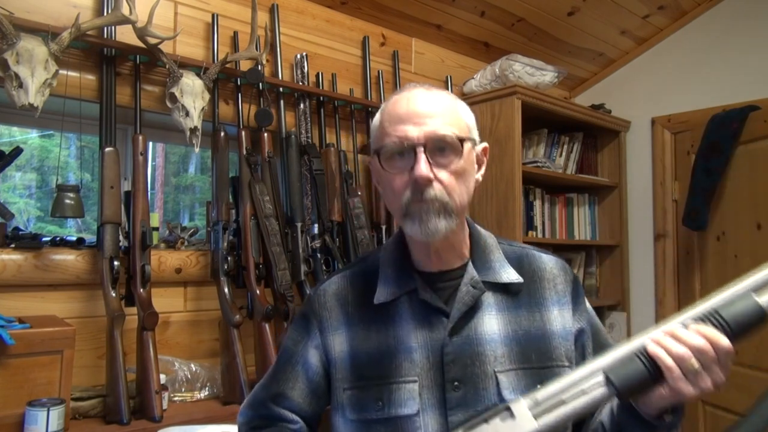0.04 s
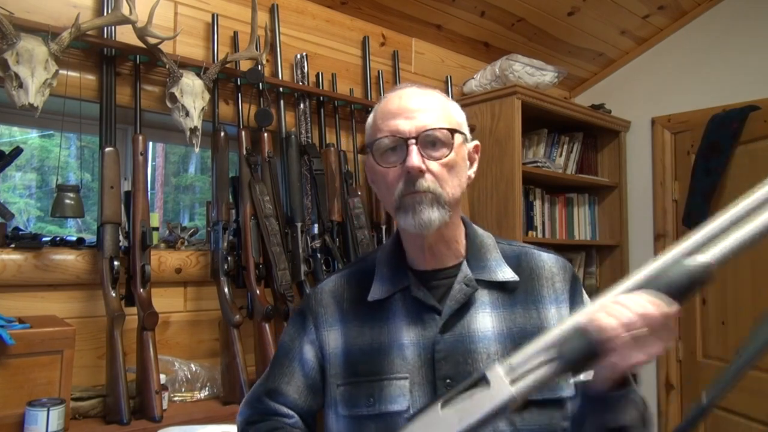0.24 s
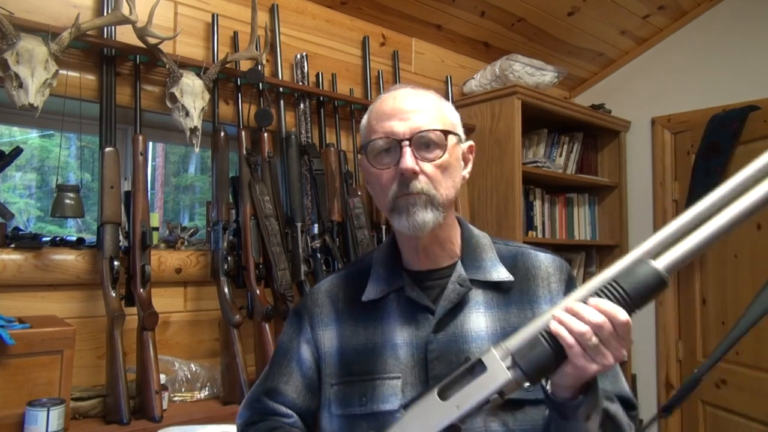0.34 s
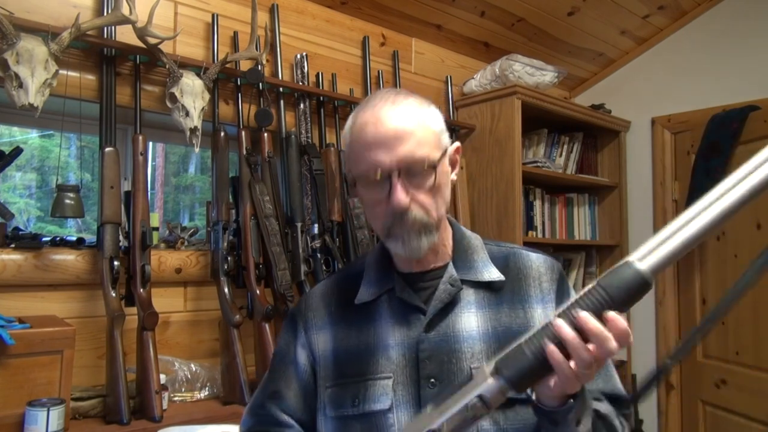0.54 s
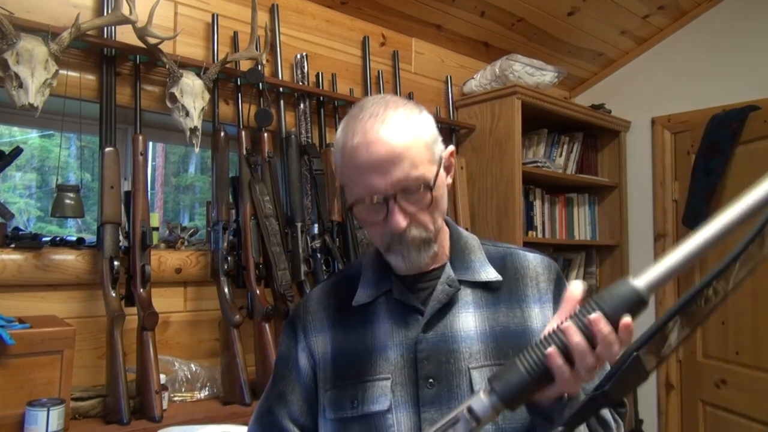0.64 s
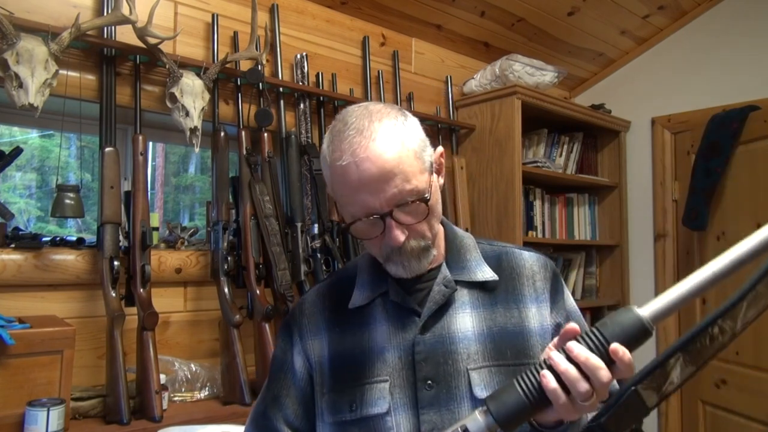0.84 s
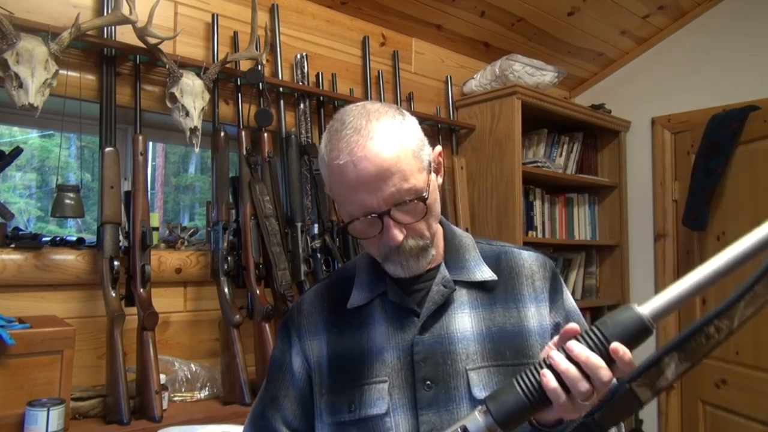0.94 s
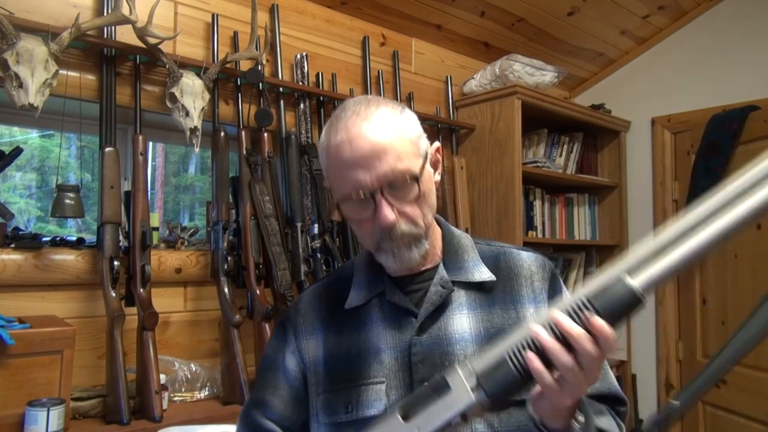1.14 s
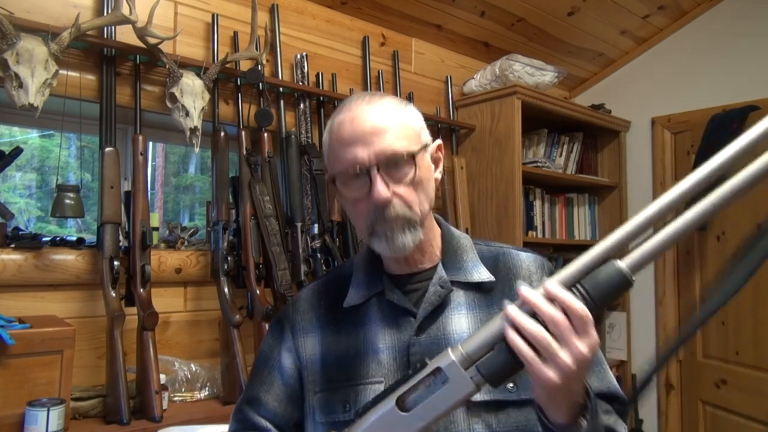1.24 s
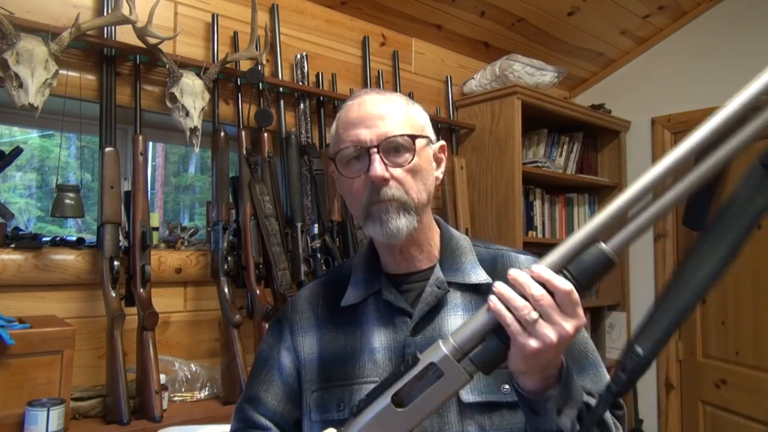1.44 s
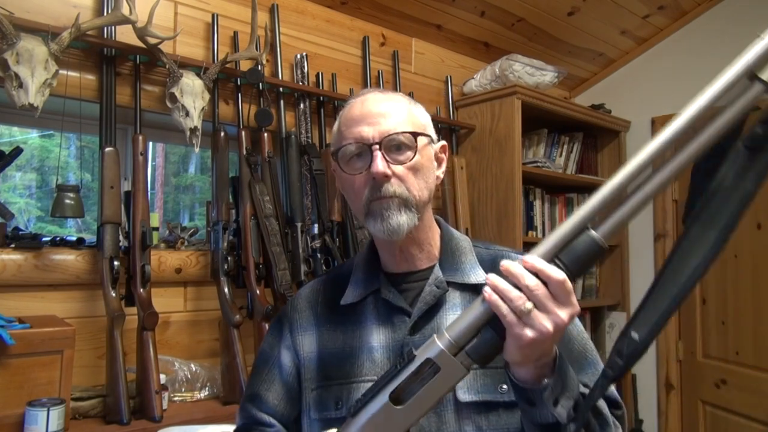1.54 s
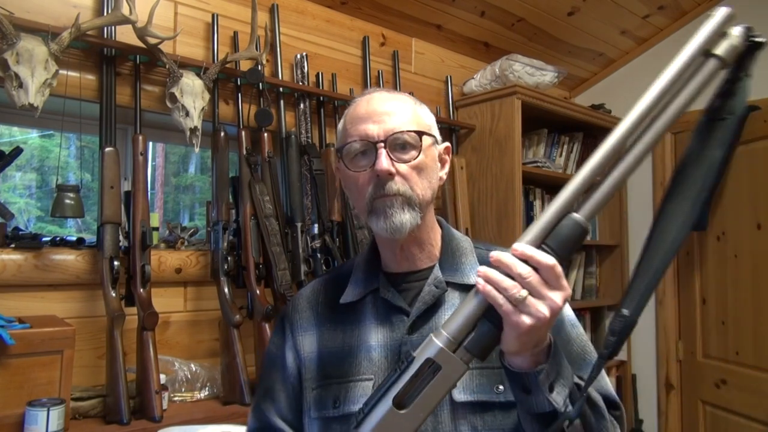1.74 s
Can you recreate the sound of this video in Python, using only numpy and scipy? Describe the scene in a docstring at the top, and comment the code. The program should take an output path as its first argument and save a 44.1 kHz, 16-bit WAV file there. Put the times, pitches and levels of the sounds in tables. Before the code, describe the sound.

A pump-action shotgun is racked close to a stereo microphone in a small wooden room: a rapid raspy steel clatter backward, a crisp click, a pause, then a firm strike and ringing slam shut.

```python
"""A small wood-panelled room, with a pump-action shotgun racked close to a camera's stereo microphones.
The slide comes back in a run of steel clacks over a bright rasp, and a small part clicks into place.
After a pause the slide rubs forward, strikes once firmly and locks shut; a thin ping follows.
Contacts are noise bursts through coloured bodies with ringing steel modes; friction is many tiny slips.
Decaying noise makes the room's tail, soft low thumps mark jolts in the hands, and faint hiss lies beneath."""
import sys
import numpy as np
from scipy import signal
from scipy.fft import rfft, irfft, next_fast_len
from scipy.io import wavfile

SR = 44100
rng = np.random.default_rng(int(sys.argv[2]) if len(sys.argv) > 2 else 0)


def unload_audio(sound):
    """Save the sound as a 16-bit wav file, at the path given as the first command line argument."""
    columns = np.transpose(np.atleast_2d(sound))
    # keep every value between -1 and 1, then stretch to whole-number steps
    steps = np.round(np.clip(columns, -1, 1) * 32767)
    wavfile.write(sys.argv[1], SR, steps.astype(np.int16))


N = 79380  # 1.8 s

# Faint room noise: colour (frequency [Hz], level [dB])
HISS_COLOUR = [(15, -54.5), (25, -25), (113, -20), (156, -18), (322, -6), (509, -1), (703, -2), (762, -1),
               (997, -1), (1270, 0), (3930, -7.5), (11200, -19.5), (15500, -25.5)]
# Its drift, before the pan (time [s], left level [dB], right level [dB])
HISS_LEVEL = [(0, -52.5, -63), (.2, -53.5, -63.5), (.9, -55.5, -65), (1.1, -56, -66.5), (1.6, -55, -64),
              (1.8, -53.5, -61.5)]
# Its balance (frequency [Hz], left minus right [dB])
HISS_PAN = [(60, -14.5), (300, -5.5), (1300, -2.5), (4400, -4.5), (8000, -7.5), (15000, -20)]

# Sliding friction on the way back, ahead of the room (time [s], level [dB])
RASP = [(.205, -88), (.23, -39), (.305, -30.5), (.325, -20), (.37, -18.5), (.398, -22), (.422, -20),
        (.45, -29.5), (.475, -45), (.52, -83)]
# Its colour (frequency [Hz], level [dB])
RASP_COLOUR = [(60, -56), (150, -39), (370, -23.5), (620, -14.5), (1000, -12.5), (2100, 2.5), (2900, -3.5),
               (4500, 1), (7300, 0.5), (9200, -3), (11200, -8.5), (13300, -19), (15500, -40.5)]

# Contacts of the slide on its way back (time [s], level relative to CLACK_DB [dB], treble tilt [dB/octave])
CLACKS = [(0.2057, -40, -3.5), (0.2105, -23, -4), (0.2186, -6.5, -1.5), (0.225, -15.5, -1.5),
          (0.2318, 0.5, 0.5), (0.2457, -6.5, 7), (0.256, -3.5, -4.5), (0.2857, -2, -3), (0.2995, -5, 3.5),
          (0.3167, 1, -0.5), (0.3234, -9.5, 0), (.3298, -2.5, 3), (0.3366, -2, -1), (0.3432, -4.5, -2),
          (0.351, -1, 2), (0.3629, -0.5, 8), (.3768, -9, 1.5), (0.392, -4.5, -1), (0.4102, -3, 4.5),
          (0.4289, -10, -2), (0.4531, -7, 3.5), (0.4599, -12, -4)]
# Their shared colour, before tilt and fore-end ring (frequency [Hz], level [dB])
CLACK_COLOUR = [(30, -65.5), (120, -50), (330, -26), (800, -20), (1300, -8), (2000, 0), (2400, -1.5),
                (2950, 0), (3700, -1), (5500, -1), (7200, -5), (9300, -18.5), (11000, -9), (13000, -20.5),
                (15500, -38)]
CLACK_DB = 8
# The fore-end rings while the slide is still near the front (time [s], boost [dB])
TUBE_RING = [(.215, 2), (.232, 8), (.29, 10), (.315, -1.5)]
TUBE_HZ, TUBE_WIDTH_HZ = 2950, 580

# The gun jolts in the hands (time [s], level [dB])
THUMPS = [(.318, -71.5), (.347, -57), (0.411, -78), (0.45, -79.5), (1.347, -65.5)]

# The gun shifts in the hands (time [s], level [dB])
KNOCKS = [(.636, -26.5), (1.13, -30.5), (1.19, -28), (1.2737, -16.5)]
# Dull colour of stock and fore-end (frequency [Hz], level [dB])
KNOCK_COLOUR = [(100, -35), (300, -15), (750, -3), (1200, -1), (2300, 2.5), (4000, -6), (12000, -44)]

# Colour of the small sprung part (frequency [Hz], level [dB])
CLICK_COLOUR = [(50, -62), (300, -50), (750, -26), (1050, -20.5), (1400, -11.5), (1650, -4.5), (1900, -8),
                (2210, 7.5), (2310, -5), (2450, 2.5), (2750, -17.5), (3200, -14.5), (3650, -23),
                (4200, -13.5), (4750, -3.5), (5100, -5.5), (5600, -4.5), (6500, -13), (7600, -27.5),
                (9800, -36), (11300, -41.5), (15000, -54)]
CLICK_S, CLICK_DB = .6760, -2

# The forward stroke, then the hands on the gun, ahead of the room (time [s], level [dB])
RUB = [(1.09, -83), (1.125, -60.5), (1.20, -56), (1.26, -59.5), (1.335, -57), (1.38, -67.5), (1.75, -69.5),
       (1.8, -84)]
# Its colour (frequency [Hz], level [dB])
RUB_COLOUR = [(120, -36.5), (250, -8.5), (700, -10.5), (1300, -2.5), (2200, -1), (3100, -7.5), (4500, -1),
              (7500, -3.5), (9300, -10), (11300, -9), (15000, -32.5)]

# The slide meets the action (time [s], level [dB])
TAPS = [(1.096, -31), (1.1267, -33.5), (1.1895, -25.5), (1.2737, -1)]
# Their colour (frequency [Hz], level [dB])
TAP_COLOUR = [(30, -68), (150, -52), (400, -26.5), (900, -15.5), (1300, -6), (1680, 6.5), (2200, -4),
              (2900, -12), (3650, -3.5), (4400, -7.5), (5400, -4), (6200, -11.5), (7500, -18), (10000, -28),
              (12000, -23), (15500, -52.5)]

# The bolt touches, slams shut and rebounds (time [s], level [dB])
LOCK = [(1.3435, -10.5), (1.3449, 8.5), (1.3512, -1), (1.3560, 1), (1.363, -2.5)]
# Its colour (frequency [Hz], level [dB])
LOCK_COLOUR = [(30, -73), (100, -46.5), (200, -31.5), (440, -14.5), (850, -15.5), (1080, -4.5), (1450, -4),
               (2100, 7.5), (2550, 0.5), (3200, -8.5), (4100, -5), (5200, -10.5), (6000, -8), (7000, -10),
               (8200, -13.5), (9300, -21.5), (12200, -18), (15500, -48.5)]

PING_S, PING_HZ, PING_DB, PING_T60_S = 1.455, 11250, -44, 0.06

# Ringing modes of barrel and receiver (frequency [Hz], relative level [dB], decay time T60 [s])
STEEL = [(1075, -8.5, 0.13), (1233, -6.5, 0.13), (1725, -1.5, 0.067), (2115, 0.5, 0.093),
         (2220, -0.5, 0.37), (2360, -2, 0.16), (3920, -4.5, .2), (4420, -7.5, 0.18), (5710, -11.5, 0.24),
         (6430, -8, 0.28), (6850, -7, 0.17), (8140, -9, .22)]

# Decay of the room (frequency [Hz], T60 [s])
ROOM_T60 = [(200, 0.1), (800, 0.26), (2100, 0.27), (5500, .3), (12000, .24)]
# Colour of its tail (frequency [Hz], level [dB])
ROOM_COLOUR = [(200, -2.5), (800, 2), (2000, -2.5), (4500, 1), (8000, 3), (13000, -1)]
# Likeness of the tail at the two microphones (frequency [Hz], left-right likeness [0-1])
ROOM_ALIKE = [(200, .4), (1000, 0.99), (3000, .65), (6000, 0.58), (9000, 0.46), (12000, .1)]
# Balance of the tail (frequency [Hz], left minus right [dB])
ROOM_PAN = [(100, -3), (400, -16), (1300, -8.5), (2400, -5), (4400, -3.5), (8000, -1), (10000, 8),
            (13000, -8.5)]
# Balance of the direct sound (frequency [Hz], left minus right [dB])
DIRECT_PAN = [(300, -5.5), (4000, -5), (8000, -4.5), (13000, -4.5)]
ROOM_DELAY_S, ROOM_RISE_S = 0.0014, 0.0022

LEFT_LAG_S = .000014  # the gun is nearer to the right microphone
TOP_HZ = 15900  # the camera's band limit


def amp(db):
    """Decibels to gain."""
    return 10 ** (np.asarray(db) / 20)


def unit(x):
    """Scale to rms 1."""
    return x / np.sqrt(np.mean(x ** 2) + 1e-20)


def along(points, hz):
    """Read (frequency, value) points on a log frequency axis."""
    f, v = np.transpose(points)
    return np.interp(np.log(hz + 1), np.log(f + 1), v)


def curves(rows):
    """One value per sample for each column after the time."""
    s, *cols = np.transpose(rows)
    return np.array([np.interp(np.arange(N) / SR, s, c) for c in cols])


def filtered(x, response):
    """Multiply the spectrum of x by a response of frequency."""
    n = x.shape[-1]
    m = next_fast_len(n + 4096)
    return irfft(rfft(x, m) * response(np.fft.rfftfreq(m, 1 / SR)), m)[..., :n]


def panned(x, pan):
    """Left and right gains from a level difference per frequency."""
    return filtered(x, lambda hz: amp(np.outer([.5, -.5], along(pan, hz))))


def body(colour, tilt_db=0, size=4096):
    """Minimum-phase impulse response of a colour, its treble tilted about 4 kHz."""
    hz = np.fft.rfftfreq(size, 1 / SR)
    octaves = np.log2(np.clip(hz, 1000, 12000) / 4000)
    cepstrum = irfft(np.log(amp(along(colour, hz) + tilt_db * octaves)))
    # folding the cepstrum makes the response causal
    cepstrum[1:size // 2] *= 2
    cepstrum[size // 2 + 1:] = 0
    return irfft(np.exp(rfft(cepstrum)))


def noise_pair(n, alike):
    """Left and right noise with a given likeness per frequency, from mid and side noises."""
    def mid_side_gains(hz):
        turn = np.arccos(np.clip(along(alike, hz), -1, 1)) / 2
        return np.array([np.cos(turn), np.sin(turn)])

    mid, side = filtered(rng.standard_normal((2, n)), mid_side_gains)
    return np.array([mid + side, mid - side])


def in_room(x, wet_db):
    """Direct sound stronger on the right, plus a fresh diffuse tail decaying at its own rate per frequency."""
    hz, t, z = signal.stft(noise_pair(SR // 2, ROOM_ALIKE), SR, nperseg=256)
    decay_db = along(ROOM_COLOUR, hz)[:, None] - 60 * t / along(ROOM_T60, hz)[:, None]
    tail = signal.istft(z * amp(decay_db), SR, nperseg=256)[1]
    tail_s = np.arange(tail.shape[1]) / SR
    tail = tail * np.clip((tail_s - ROOM_DELAY_S) / ROOM_RISE_S, 0, 1)
    tail = tail * np.sqrt(2) / np.linalg.norm(tail)
    wet = signal.fftconvolve(x[None], tail, axes=1)[:, :len(x)]
    return panned(x, DIRECT_PAN) + amp(wet_db) * panned(wet, ROOM_PAN)


def add(out, s, x):
    """Mix x into out at time s."""
    part = out[:, round(s * SR):][:, :x.shape[-1]]
    part += x[..., :part.shape[1]]


def blow(response, push, swell_s, ring_db):
    """One contact: a push and flattened burst of chatter excite a body, and the steel rings on."""
    t = np.arange(SR // 2) / SR
    burst = rng.standard_normal(len(t)) * t / swell_s * np.exp(-t / swell_s)
    impulse = np.arange(len(t)) == round(swell_s * SR)
    z = rfft(burst / np.linalg.norm(burst) + push * impulse)
    # most of the spectral unevenness is removed
    force = irfft(z / (np.abs(z) + 1e-6) ** .8, len(t)) * (t < .1)
    knock = signal.fftconvolve(force, response)[:len(t)]

    ring = np.zeros(len(t))
    for hz, db, t60 in STEEL:
        level = amp(db + rng.normal(0, 2) - 60 * t / t60)
        ring += level * np.sin(2 * np.pi * (hz * t + rng.random()))
    ring = ring * (1 - np.exp(-t / .002))
    return knock / np.linalg.norm(knock) + amp(ring_db) * ring / np.linalg.norm(ring)


def blows(rows, colour, wet_db, **contact):
    """Contacts of one colour in the room, each with new chatter and a new tail."""
    out = np.zeros((2, N))
    response = body(colour)
    for s, db in rows:
        add(out, s, amp(db) * in_room(blow(response, **contact), wet_db))
    return out


def friction(level, colour, slips_per_s, scatter_db):
    """Many tiny slips of random sign excite a body under a stroke; scatter_db makes their sizes uneven."""
    slips = (rng.random(N) < slips_per_s / SR) * rng.choice([-1, 1], N)
    slips = slips * amp(scatter_db * np.clip(rng.standard_normal(N), -2, 2))
    return amp(curves(level)[0]) * unit(signal.fftconvolve(slips, body(colour))[:N])


def hiss():
    """Faint, slowly drifting room noise, stronger on the left overall."""
    alike = [(100, .4), (1500, .5), (10000, 0.099)]  # (frequency [Hz], left-right likeness [0-1])
    air = filtered(noise_pair(N, alike), lambda hz: amp(along(HISS_COLOUR, hz)))
    return amp(curves(HISS_LEVEL)) * unit(panned(air, HISS_PAN))


def rasp():
    """The slide rasps to the rear in sparse, uneven slips."""
    return in_room(friction(RASP, RASP_COLOUR, slips_per_s=1800, scatter_db=3.5), wet_db=0)


def clacks():
    """The slide clatters to the rear, with the fore-end resonance changing along the stroke."""
    out = np.zeros((2, N))
    for s, db, tilt_db in CLACKS:
        boost_db = np.interp(s, *np.transpose(TUBE_RING))
        colour = [(hz, level + boost_db * np.exp(-((hz - TUBE_HZ) / TUBE_WIDTH_HZ) ** 2))
                  for hz, level in CLACK_COLOUR]
        clack = blow(body(colour, tilt_db), push=.05, swell_s=.0011, ring_db=-24)
        add(out, s, amp(CLACK_DB + db) * in_room(clack, wet_db=-1.5))
    return out


def thumps():
    """Jolts in the hands give short, soft low pushes of decaying noise."""
    out, t = np.zeros((2, N)), np.arange(SR // 4) / SR
    colour = [(30, -1.5), (160, -3.5), (400, -22.5), (1500, -79)]  # (frequency [Hz], level [dB])
    for s, db in THUMPS:
        low = unit(filtered(noise_pair(len(t), [(100, .5)]), lambda hz: amp(along(colour, hz))))
        add(out, s, low * amp(db - 60 * t / 0.047) * (1 - np.exp(-t / 0.005)))
    return out


def knocks():
    """Dull knocks of the stock and fore-end, with much of the room in them."""
    return blows(KNOCKS, KNOCK_COLOUR, wet_db=5.5, push=0.23, swell_s=0.0013, ring_db=-17)


def click():
    """A small sprung part snaps home, with little ring from the steel."""
    return blows([(CLICK_S, CLICK_DB)], CLICK_COLOUR, wet_db=-3.5, push=.5, swell_s=.0007, ring_db=-38)


def rub():
    """The slide rubs forward, then the hands rub the gun, in dense slips of even size."""
    return in_room(friction(RUB, RUB_COLOUR, slips_per_s=5200, scatter_db=0), wet_db=-1.5)


def taps():
    """The slide meets the action in light taps and one firm strike."""
    return blows(TAPS, TAP_COLOUR, wet_db=-1, push=.4, swell_s=.0005, ring_db=-16)


def lock():
    """The bolt slams shut in a tight group of contacts, ringing the steel most strongly."""
    return blows(LOCK, LOCK_COLOUR, wet_db=1, push=.6, swell_s=.0006, ring_db=-12)


def late_ping():
    """A thin high ping: one decaying sine with a soft onset."""
    out, t = np.zeros((2, N)), np.arange(SR // 4) / SR
    ping = amp(PING_DB - 60 * t / PING_T60_S) * np.sin(2 * np.pi * PING_HZ * t)
    ping = ping * (1 - np.exp(-t / 0.0011))
    add(out, PING_S, in_room(ping, wet_db=-10))
    return out


def scene():
    """The whole racking cycle in the room, reaching the left microphone slightly later."""
    backward = rasp() + clacks()
    snap = click()
    forward = rub() + taps() + lock() + late_ping()
    gun = backward + snap + forward + knocks()
    lagged = filtered(gun, lambda hz: np.exp(-2j * np.pi * np.outer([LEFT_LAG_S, 0], hz)))
    return lagged + thumps() + hiss()


def record(dry):
    """The camera rounds off the highest peaks and keeps nothing above its band limit."""
    soft = dry / (1 + np.abs(dry / .88) ** 5) ** (1 / 5)
    return filtered(soft, lambda hz: hz < TOP_HZ)


dry = scene()
out = record(dry)
unload_audio(out)
```